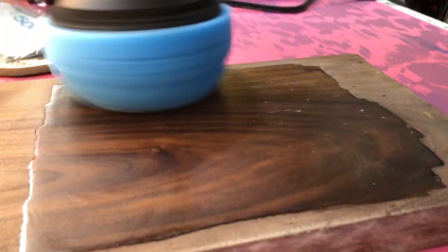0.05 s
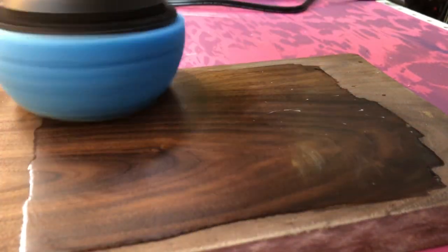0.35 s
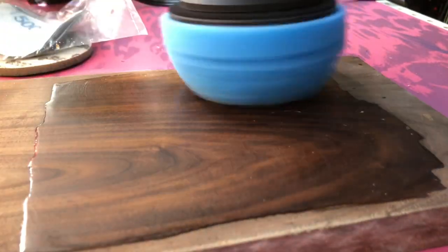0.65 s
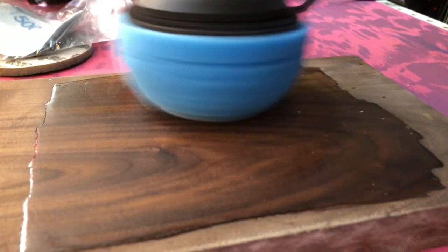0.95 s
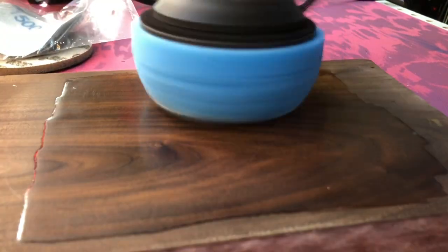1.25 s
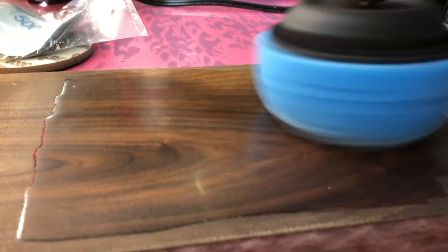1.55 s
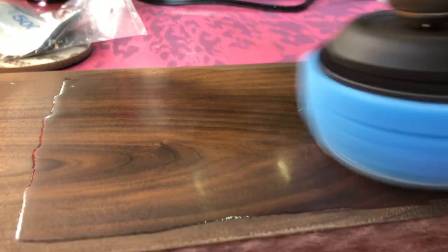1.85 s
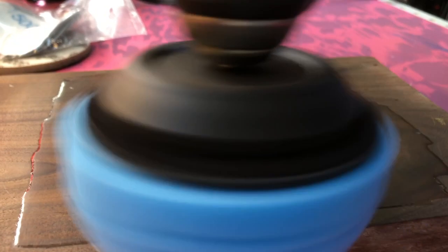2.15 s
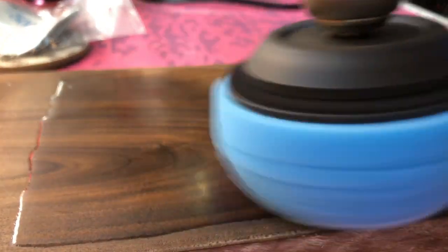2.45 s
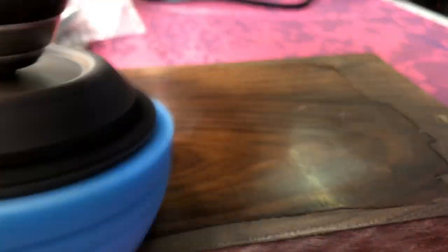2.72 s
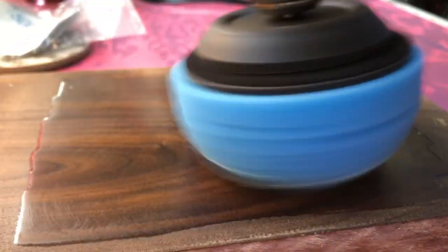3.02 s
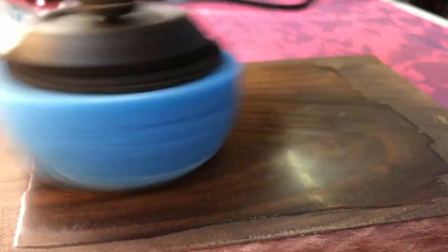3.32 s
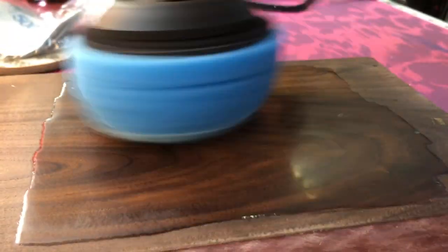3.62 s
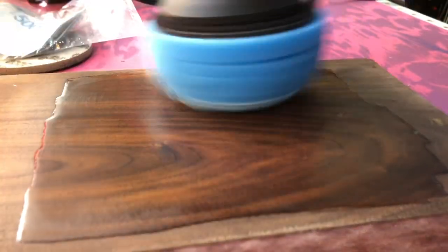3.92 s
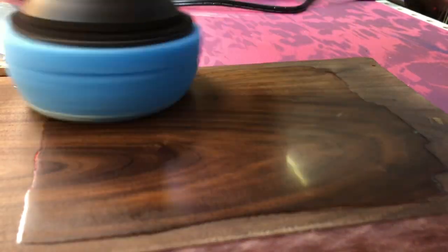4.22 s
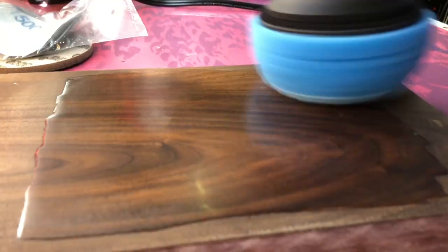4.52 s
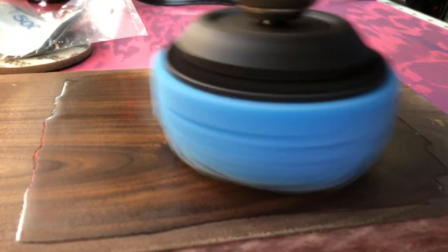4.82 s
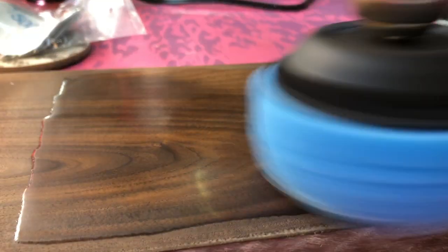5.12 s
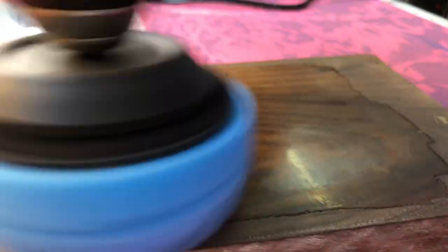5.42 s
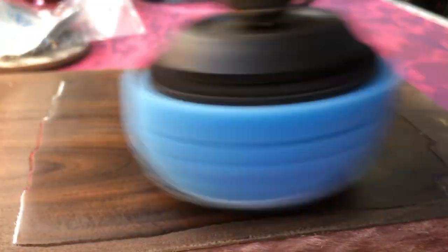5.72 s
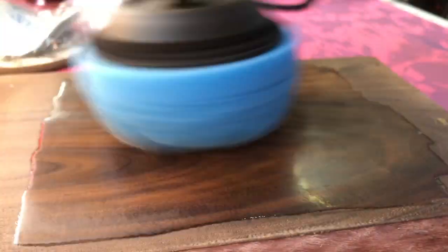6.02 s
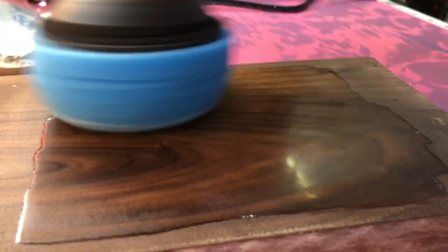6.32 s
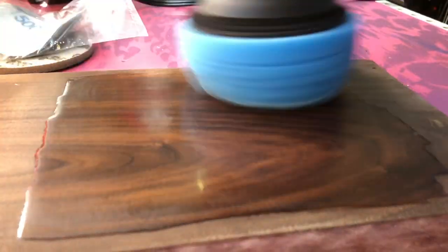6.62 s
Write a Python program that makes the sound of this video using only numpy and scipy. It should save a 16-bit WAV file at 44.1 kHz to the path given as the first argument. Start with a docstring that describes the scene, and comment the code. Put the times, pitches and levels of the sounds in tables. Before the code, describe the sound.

An electric drill whines close by, its pitch wavering as it rubs a foam polishing ball back and forth over a wooden board.

```python
"""At a workbench, close to the microphone, an electric drill spins a foam ball over a finished board.
Trigger and load move the motor speed, which carries a whining family of gear and motor tones.
Under them the gears rattle, the brushes hiss, the fan blows and the foam rubs the wood to and fro,
now and then bumping, squeaking or biting. Just after a second in, the level dips briefly to nothing."""
import sys
import numpy as np
from scipy import signal
from scipy.fft import rfft, irfft, next_fast_len
from scipy.io import wavfile
from scipy.ndimage import uniform_filter1d

SR = 44100
rng = np.random.default_rng(int(sys.argv[2]) if len(sys.argv) > 2 else 0)


def waveform_to_disk(signal):
    """Save audio, clipped to [-1, 1], as 16-bit WAV at the path in sys.argv[1]."""
    frames = np.transpose(np.atleast_2d(signal))
    scaled = np.clip(frames, -1, 1) * 32767
    samples = np.round(scaled).astype(np.int16)
    wavfile.write(sys.argv[1], SR, samples)


N = 302526
TIME_S = np.arange(N) / SR
CRUISE_HZ, BAND_LIMIT_HZ = 296, 15850


def amp(db):
    """Decibels to gain."""
    return np.exp(np.asarray(db) * (np.log(10) / 20))


def unit(x):
    """Scales to rms 1."""
    return x / np.sqrt(np.mean(x ** 2) + 1e-20)


def follow(points):
    """A curve through (time_s, value) points."""
    return np.interp(TIME_S, *np.transpose(points))


def gain_at(points, hz):
    """Gain of (frequency_hz, gain_db) points at hz."""
    point_hz, db = np.transpose(points)
    return amp(np.interp(np.log(hz + 1), np.log(point_hz), db))


def swell(peak_s, width_s):
    """A bell-shaped rise and fall."""
    return np.exp(-np.minimum(abs(TIME_S - peak_s) / width_s, 10) ** 2 / 2)


def noise(gain):
    """Noise of rms 1 whose spectrum is gain(hz)."""
    size = next_fast_len(N, True)
    hz = np.fft.rfftfreq(size, 1 / SR)
    return unit(irfft(rfft(rng.standard_normal(size)) * gain(hz), size)[:N])


def rush(colour):
    """Noise coloured by (frequency_hz, gain_db) points."""
    return noise(lambda hz: gain_at(colour, hz))


def wander(rate_hz):
    """A smooth random curve of rms 1 that moves at up to about this rate."""
    knots = signal.resample_poly(rng.standard_normal(int(2 * rate_hz * N / SR) + 4), 2, 1)
    return np.interp(4 * rate_hz * TIME_S, np.arange(len(knots)), unit(knots))


def tone(cycles, flutter_db, jitter_rad):
    """A machine tone of rms 1, shaking in level and phase."""
    shake = jitter_rad * (wander(25) + 0.58 * wander(140))
    return unit(amp(flutter_db * wander(35)) * np.sin(2 * np.pi * cycles + shake))


# The motor under trigger and load: time_s, speed_hz
MOTOR_SPEED = [(0.0, 376), (0.06, 374), (0.12, 407), (0.51, 408.5), (0.62, 335), (0.76, 289), (0.83, 300),
               (0.94, 388), (1.01, 399), (1.08, 397), (1.12, 304), (1.17, 299), (1.2, 317), (1.27, 310),
               (1.38, 336), (1.5, 292), (1.56, 284), (1.63, 295), (1.78, 294), (1.83, 318), (1.94, 332),
               (2.12, 307), (2.23, 331), (2.38, 281), (2.48, 295), (2.73, 296), (2.86, 277), (2.92, 287),
               (3.01, 295), (3.06, 285.5), (3.21, 295.5), (3.36, 294), (3.48, 286), (3.58, 264),
               (3.67, 254.5), (4.11, 255.2), (4.16, 267), (4.33, 255), (4.53, 255), (4.6, 272.5),
               (4.85, 254.5), (5.14, 254.5), (5.19, 262.5), (5.33, 263), (5.39, 255), (5.44, 280),
               (5.56, 277), (5.68, 293), (5.95, 298), (6.23, 295), (6.47, 297.5), (6.73, 287), (6.77, 331),
               (6.86, 329)]
# The drill nears the microphone and draws back: time_s, closeness_db
MIC_CLOSENESS = [(0, -0.6), (.5, -1.3), (.75, -1.5), (1.0, -1), (1.6, -0.4), (2.25, 2), (2.75, 1.9),
                 (3.2, 1.65), (3.8, -1), (4.55, -2), (4.9, 0.5), (5.35, 1.5), (5.8, 1), (6.1, 0.8),
                 (6.55, -1), (6.86, -1)]
# The hand turns at the right end of the board: time_s
STROKE_TURNS = [-.3, .12, .6, 1.11, 1.59, 2.04, 2.62, 3.12, 3.6, 4.09, 4.63, 5.15, 5.73, 6.17, 6.66, 7.15]

def motion():
    """Motor speed, rounded off by the rotor's inertia; closeness; side of the board (+1 right)."""
    speed_hz = uniform_filter1d(follow(MOTOR_SPEED), round(0.025 * SR))
    strokes = np.interp(TIME_S, STROKE_TURNS, np.arange(len(STROKE_TURNS)))
    return speed_hz, follow(MIC_CLOSENESS), np.cos(2 * np.pi * strokes)


# The leading tones, by name: cycles_per_turn
LEADING_ORDERS = {"imbalance": 1, "mesh": 4, "mesh second": 8, "second stage": 72 / 7, "mesh third": 12,
                  "high whine": 19.88}
# How each moves at the microphone, by name: closeness_share, right_end_db, flutter_db, jitter_rad
SWAY = {"imbalance": (.5, -2.6, 1.3, .1), "mesh": (.1, -.6, 1.4, .18), "mesh second": (1.2, -.6, 2.0, .55),
        "second stage": (.6, 1.0, 1.6, .27), "mesh third": (1.1, .1, 1.5, .23),
        "high whine": (.3, 2.5, 1.5, .52)}
# The drill's resonances, one table for each tone that crosses them: pitch_hz, gain_db
IMBALANCE_RESONANCE = [(254, -55), (283, -54), (296, -46.5), (312, -50), (333, -45.5), (365, -48),
                       (407, -39.5)]
MESH_SECOND_RESONANCE = [(2030, -60), (2230, -45), (2370, -44.5), (2550, -39.5), (2780, -39), (3050, -37),
                         (3200, -48), (3270, -45)]
SECOND_STAGE_RESONANCE = [(2610, -31.5), (2720, -33), (2900, -38.5), (3040, -38.5), (3280, -36.5),
                          (3400, -35), (3650, -41), (4190, -41)]
MESH_THIRD_RESONANCE = [(3050, -33), (3200, -35), (3370, -33), (3540, -38), (3750, -42), (3980, -39),
                        (4400, -44), (4890, -47)]
HIGH_WHINE_RESONANCE = [(5060, -26.5), (5300, -26.3), (5520, -29), (5740, -26.5), (5900, -29.5),
                        (6200, -34), (6550, -38), (7200, -44), (8090, -41)]
# The gear mesh tone comes and goes: time_s, gain_db
MESH_GAIN = [(0, -34), (.38, -38.5), (.5, -28.5), (.62, -34), (.8, -45), (.95, -35), (1.15, -39.5),
             (1.6, -39.5), (2.28, -38.5), (2.41, -29.5), (2.75, -40.5), (3.1, -34), (3.58, -48),
             (3.8, -35.5), (4.13, -45), (4.35, -35.5), (4.66, -53), (4.85, -37.5), (5.25, -50), (5.37, -32),
             (5.48, -39.5), (5.7, -31.5), (5.85, -40), (5.95, -57), (6.86, -46)]
# The high whine briefly sinks or rises: peak_s, change_db, width_s
WHINE_SWELLS = [(.72, -8, .1), (1.72, -4, .04), (1.92, -8, .04), (2.17, -7, .025), (2.29, 6, .03),
                (2.47, -8, .09), (2.8, -10, .025), (3.83, -10, .045), (4.3, -4, .08), (5.08, -11, .025),
                (5.38, -8, .07), (5.74, -6, .04), (6.24, -3.5, .08), (6.7, -6, .08)]

def leading_tones(turns, speed_hz, close_db, side, rasp_db):
    """Shaft and gear tones pass through resonances with the speed and swing with each stroke."""
    def voice(name):
        share, right_end_db, flutter_db, jitter_rad = SWAY[name]
        drift_db = 1.25 * wander(7)
        gain = amp(share * close_db + right_end_db * side + drift_db)
        return gain * tone(LEADING_ORDERS[name] * turns, flutter_db, jitter_rad)

    def resonant(name, resonance):
        return gain_at(resonance, LEADING_ORDERS[name] * speed_hz) * voice(name)

    shaft = resonant("imbalance", IMBALANCE_RESONANCE)
    mesh = amp(follow(MESH_GAIN)) * voice("mesh")
    mesh += resonant("mesh second", MESH_SECOND_RESONANCE)
    gears = resonant("second stage", SECOND_STAGE_RESONANCE)
    gears += resonant("mesh third", MESH_THIRD_RESONANCE)
    whine = resonant("high whine", HIGH_WHINE_RESONANCE)
    whine_db = sum(db * swell(peak_s, width_s) for peak_s, db, width_s in WHINE_SWELLS)
    return shaft + mesh + amp(rasp_db) * gears + amp(whine_db) * whine


# Weak gear and bearing tones: cycles_per_turn, relative_db
WEAK_TONES = [(.667, -14.5), (2.33, -8.5), (2.62, -13.5), (4.54, -9.5), (6, -27), (6.87, -12.5),
              (9.2, -6.5), (9.58, -13), (10.96, -12), (11.42, -8.5), (13.71, -10.5), (16, -15),
              (18.3, -9.5), (19.3, -10), (20.55, -0.5), (22.8, -5), (24.05, -4.5), (27.4, -7.5),
              (32.05, -12), (34.4, -22), (39.76, -11), (40.4, -9)]
# How well the housing radiates them: frequency_hz, gain_db
HOUSING_RESPONSE = [(150, -0.5), (800, -3), (1150, 1.5), (1340, 2), (1520, 1), (1850, 0.5), (2350, 0.5),
                    (2700, 1.5), (3500, 1.5), (4500, 4.5), (6000, -4), (6900, -5), (8100, 0), (10100, 0.5),
                    (11500, -11)]

def weak_tones(turns, speed_hz, gain_db):
    """Tones locked to the shaft; backlash shakes them all together, high orders most."""
    backlash = wander(25) + 0.48 * wander(140)
    tones = np.zeros(N)
    for order, db in WEAK_TONES:
        gain = amp(db + 4.45 * wander(35)) * gain_at(HOUSING_RESPONSE, order * speed_hz)
        shake = (0.23 + 0.041 * order) * backlash
        tones += gain * np.sin(2 * np.pi * order * turns + shake)
    return amp(gain_db + 2) * tones


# Gears and bearings beat on the noise: cycles_per_turn, rattle_depth, air_depth
GEAR_BEATS = [(.052, 0.071, 0.1), (0.207, 0.027, 0.084), (.667, 0.083, 0.03), (1.74, 0.14, .01),
              (2.35, 0.037, 0.084), (4.54, .01, .07)]

def chopping(turns):
    """Gains for rattle and air: turning parts chop both, and uneven tooth contact shakes the rattle."""
    orders, rattle_depth, air_depth = np.transpose(GEAR_BEATS)
    beats = np.sin(2 * np.pi * (orders[:, None] * turns + rng.random((len(orders), 1))))
    tooth_contact = amp(1.04 * wander(120))
    return tooth_contact * (1 + rattle_depth @ beats), 1 + air_depth @ beats


# The gears from close by: frequency_hz, gain_db
GEAR_COLOUR = [(200, -29), (330, -16.5), (600, -23), (1300, -13.5), (1600, -7), (1900, -4.5), (2150, -6.5),
               (2380, -1.5), (2520, -0.5), (2800, -0.5), (3250, 1), (3700, -6), (4600, -26), (8000, -34)]
# Narrow modes of the housing: centre_hz, width_hz, gain_db
HOUSING_MODES = [(1460, 104, -6), (1877, 43, -9), (2460, 77, -7.5), (2720, 99, 1.5), (3080, 120, -6),
                 (3360, 130, -7), (3630, 85, -4), (4395, 94, 0.5), (4730, 92, 0), (5610, 100, 4),
                 (7740, 160, 0), (8430, 78, 4)]

def gear_rattle(gain_db):
    """The gears rattle broadly and ring the housing."""
    def mode_power(hz):
        return sum(amp(db) ** 2 / (1 + (2 * (hz - centre_hz) / width_hz) ** 2) ** 2
                   for centre_hz, width_hz, db in HOUSING_MODES)

    housing = noise(lambda hz: np.sqrt(mode_power(hz)))
    return amp(gain_db + 4.5) * rush(GEAR_COLOUR) + amp(gain_db + 0.5) * housing


# The brushes from close by: frequency_hz, gain_db
BRUSH_COLOUR = [(1500, -25), (3000, -11.5), (3800, 0), (4300, 0), (4650, 0), (5200, 4), (5700, 2),
                (6100, 1), (6500, -6), (7000, -9.5), (9000, -18.5)]

def brush_hiss(gain_db):
    """The brushes hiss as they slide in the motor."""
    return amp(gain_db + 2) * rush(BRUSH_COLOUR)


def vent_roar(octaves):
    """The vents roar at speed."""
    return amp(-42.5 + 25 * octaves) * rush([(2500, -31), (3800, 0), (4400, 3), (4900, -5), (6000, -21)])


# The fan from close by: frequency_hz, gain_db
FAN_COLOUR = [(3000, -25), (6000, -7.5), (6600, -4), (7000, -7.5), (7550, -1), (8150, 0.5), (8800, -2),
              (9600, -5.5), (10300, -8.5), (11200, -13.5), (13000, -20.5), (15800, -24)]

def fan_air(gain_db):
    """The fan blows a bright, fluttering stream of air."""
    return amp(gain_db - 0.5 + 1.3 * wander(200)) * rush(FAN_COLOUR)


def sparks(octaves):
    """Sparks fizz unevenly, more at high speed."""
    fizz = unit(amp(2.5 * wander(900) + 0.83 * wander(25)))
    colour = [(5000, -25), (10000, 5), (11800, 1), (13500, -2), (16000, -8)]
    return amp(-44 + 14 * octaves) * fizz * rush(colour)


# The bench under the board: frequency_hz, gain_db
BENCH_COLOUR = [(18, -50), (28, -21), (42, -6), (70, 2), (110, -1.5), (160, -4.5), (250, -5), (500, -30)]
# Its rumble at the microphone: time_s, level_db
BENCH_LEVEL = [(0, -51), (.15, -43.5), (.62, -43.5), (.8, -62), (1.05, -51), (1.5, -59), (2.1, -51.5),
               (3.2, -54), (3.85, -58), (4.5, -47), (4.85, -59), (5.6, -52), (6.1, -57.5), (6.86, -56)]

def bench_rumble():
    """The polishing shakes the bench."""
    return amp(follow(BENCH_LEVEL)) * rush(BENCH_COLOUR)


# Foam on wood from close by: frequency_hz, gain_db
FOAM_COLOUR = [(105, -23), (170, -16.5), (230, -9), (370, -10.5), (510, -8), (590, -2), (690, -1.5),
               (770, 2.5), (910, -1.5), (1050, 2), (1300, -6.5), (1600, -19.5), (3000, -38)]

def foam_rub(octaves, gain_db):
    """The ball rubs the board, sounds its lowest mode and stirs a low whirr at high speed."""
    rub = amp(gain_db + 2) * rush(FOAM_COLOUR) * amp(1.16 * wander(30))
    board = amp(gain_db - 17) * noise(lambda hz: 1 / (1 + ((hz - 146) / 14) ** 2))
    whirr = rush([(100, -25), (240, -6), (330, 2.5), (450, 8), (540, -20), (900, -21)])
    return rub + board + amp(-56.5 + 29 * octaves) * whirr


# The hum at the microphone: time_s, level_db
HUM_LEVEL = [(0, -65), (.3, -54), (.6, -48), (1.0, -52), (1.2, -70), (1.5, -90)]

def low_hum(pitch_hz=98):
    """A low hum while the drill runs flat out."""
    return amp(follow(HUM_LEVEL)) * tone(pitch_hz * TIME_S, flutter_db=-2, jitter_rad=0.3)


# Squeals from the gears: peak_s, level_db, width_s
GEAR_SQUEALS = [(.003, -29, .008), (.023, -29, .007), (.076, -26, .009), (.094, -31, .008),
                (.888, -28, .008), (.92, -26, .007), (.95, -29, .007), (6.737, -33, .008),
                (6.765, -35, .016)]

def gear_squeals(turns):
    """The gears squeal in bursts as the motor pulls up."""
    bursts = sum(amp(db) * swell(peak_s, width_s) for peak_s, db, width_s in GEAR_SQUEALS)
    return bursts * tone(LEADING_ORDERS["mesh second"] * turns, flutter_db=1.5, jitter_rad=0.55)


# Bumps on the board: peak_s, pitch_hz, level_db, width_s
BALL_BUMPS = [(1.04, 50, -46, .05), (4.54, 64.8, -50, .04), (6.68, 55, -54, .05)]

def ball_bumps():
    """The ball bumps the board with soft, low thuds."""
    return sum(amp(db) * swell(peak_s, width_s) * tone(pitch_hz * TIME_S, flutter_db=4, jitter_rad=1)
               for peak_s, pitch_hz, db, width_s in BALL_BUMPS)


# Thin squeaks on the finish: peak_s, pitch_hz, level_db, width_s
FOAM_SQUEAKS = [(1.64, 11800, -44, .035), (2.14, 11600, -39, .04), (3.83, 12200, -49, .03),
                (5.25, 11500, -43, .035), (5.46, 14200, -44, .03), (5.98, 13800, -50, .03),
                (6.52, 12000, -40, .03)]

def foam_squeaks():
    """Brief narrow hisses where the foam catches."""
    squeaks = np.zeros(N)
    for peak_s, pitch_hz, db, width_s in FOAM_SQUEAKS:
        hiss = noise(lambda hz: np.exp(-((hz - pitch_hz) / 450) ** 2))
        squeaks += amp(db) * swell(peak_s, width_s) * hiss
    return squeaks


# The foam bites on the board: peak_s, brush_boost_db, gear_boost_db, width_s
FOAM_BITES = [(1.96, 3.2, 1.5, .06), (2.26, 2.2, 7, .06), (4.75, 2, 0, .07), (5.08, 2.4, 0, .08),
              (5.45, 0, 3, .13)]

def foam_bites():
    """Each bite loads the motor: the dB by which brushes and gears rasp louder."""
    brush_db = sum(db * swell(peak_s, width_s) for peak_s, db, _, width_s in FOAM_BITES)
    gear_db = sum(db * swell(peak_s, width_s) for peak_s, _, db, width_s in FOAM_BITES)
    return brush_db, gear_db


# How each noise moves at the microphone: cruise_db, db_per_speed_octave, closeness_share, right_end_db
RUB_SWAY = (-39, 2.5, 0.33, 0.25)
RATTLE_SWAY = (-36.5, 8, 1.3, 0.3)
BRUSH_SWAY = (-32, 4.5, 0.13, 1)
AIR_SWAY = (-29.5, 6.5, 0.85, -0.7)

def scene():
    """Drill and board, centred before the microphone, follow the motor and the hand that moves it."""
    speed_hz, close_db, side = motion()
    turns = np.cumsum(speed_hz) / SR
    octaves = np.log2(speed_hz / CRUISE_HZ)
    rub_db, rattle_db, brush_db, air_db = (
        cruise_db + octave_db * octaves + share * close_db + end_db * side
        for cruise_db, octave_db, share, end_db in (RUB_SWAY, RATTLE_SWAY, BRUSH_SWAY, AIR_SWAY))
    bite_db, rasp_db = foam_bites()

    tones = leading_tones(turns, speed_hz, close_db, side, rasp_db)
    tones += weak_tones(turns, speed_hz, rattle_db + 0.45 * rasp_db)
    throb = 1 + 0.12 * np.sin(2 * np.pi * 0.052 * turns)  # once per turn of the ball
    whine = throb * tones + gear_squeals(turns)

    rattle_chop, air_chop = chopping(turns)
    rattle = gear_rattle(rattle_db) + brush_hiss(brush_db + bite_db) + vent_roar(octaves)
    drill = whine + rattle_chop * rattle + air_chop * fan_air(air_db) + sparks(octaves)
    mono = drill + bench_rumble() + foam_rub(octaves, rub_db) + low_hum() + ball_bumps() + foam_squeaks()
    return np.array([mono, mono])


# The sound fades out and straight back in: silent_s, fade_out_s, fade_in_s
LEVEL_DIP = (1.104, 0.037, 0.034)

def record(dry):
    """The level dips briefly to nothing, and the highest treble is cut off."""
    silent_s, fade_out_s, fade_in_s = LEVEL_DIP
    since_s = TIME_S - silent_s
    dip = np.minimum(np.maximum(-since_s / fade_out_s, since_s / fade_in_s), 1)
    lowpass = signal.firwin(511, BAND_LIMIT_HZ, window=("kaiser", 9), fs=SR)
    return signal.oaconvolve(dry * dip, lowpass[None], "same")


dry = scene()
out = record(dry)
waveform_to_disk(out)
```